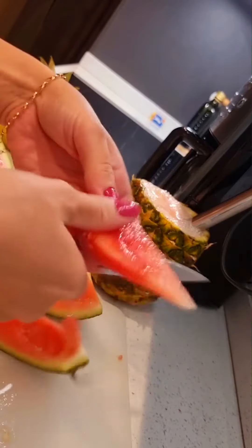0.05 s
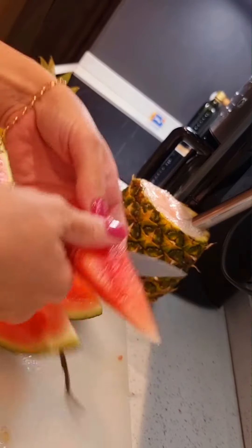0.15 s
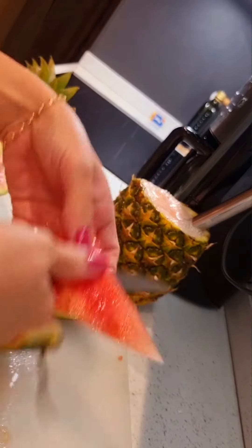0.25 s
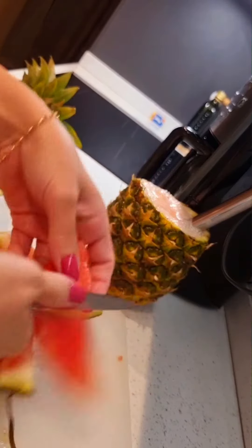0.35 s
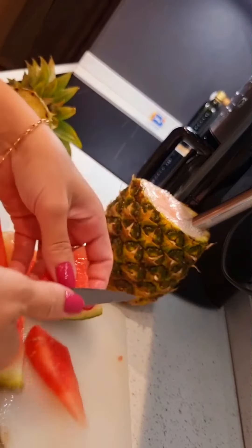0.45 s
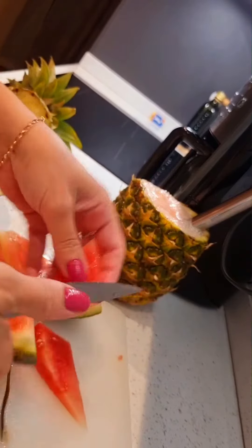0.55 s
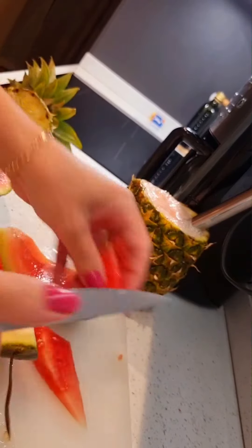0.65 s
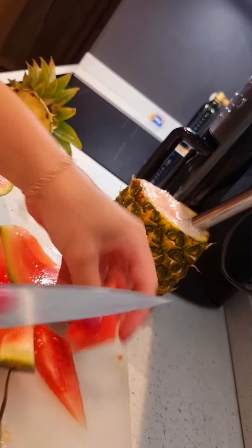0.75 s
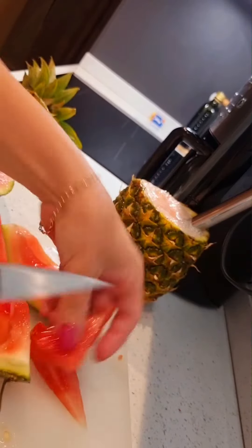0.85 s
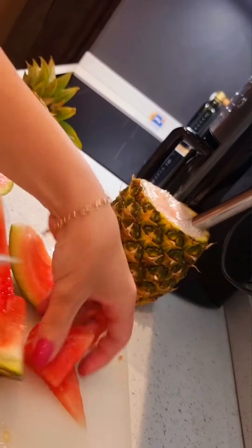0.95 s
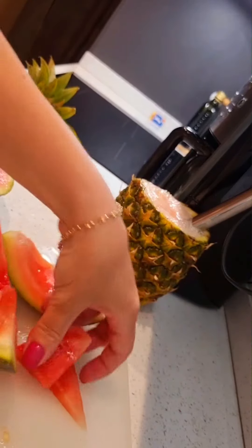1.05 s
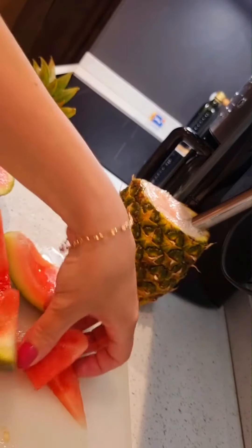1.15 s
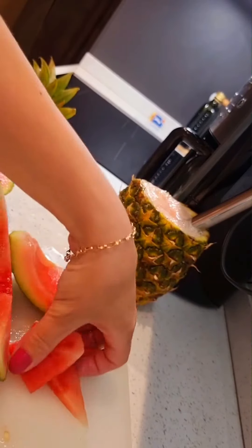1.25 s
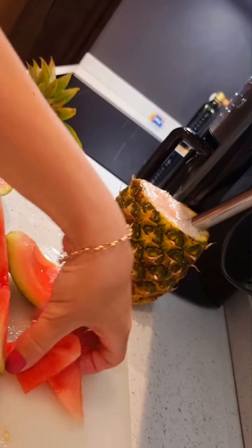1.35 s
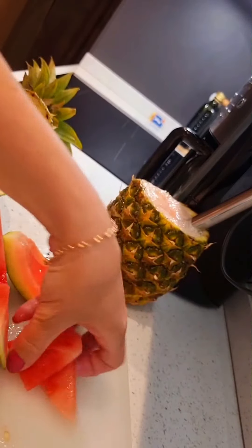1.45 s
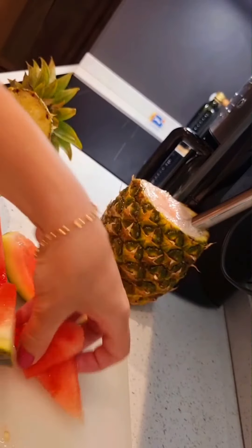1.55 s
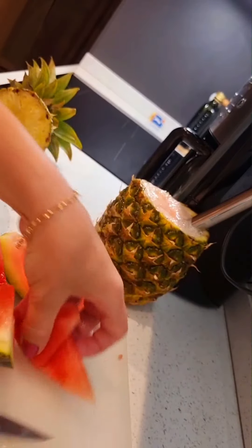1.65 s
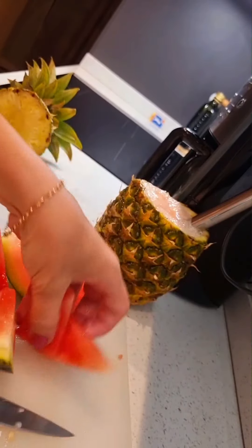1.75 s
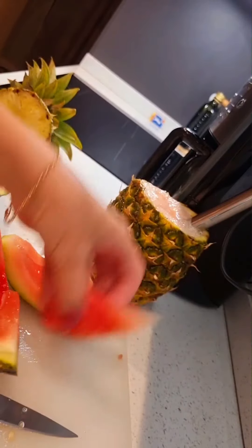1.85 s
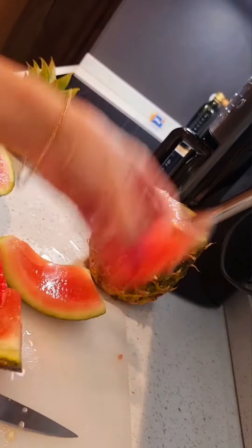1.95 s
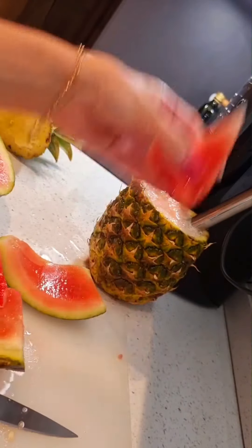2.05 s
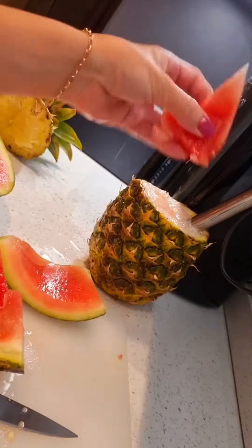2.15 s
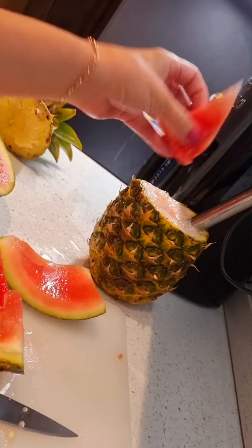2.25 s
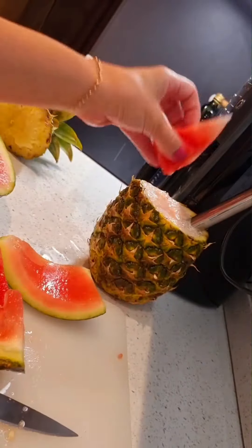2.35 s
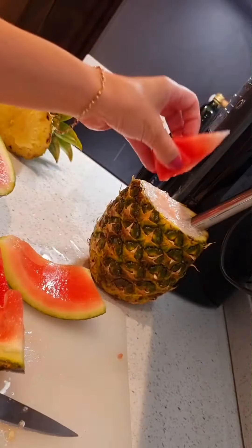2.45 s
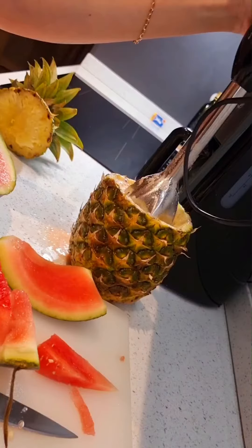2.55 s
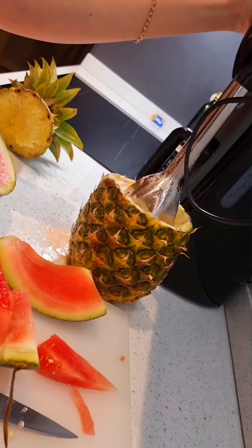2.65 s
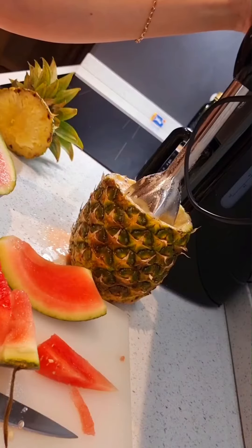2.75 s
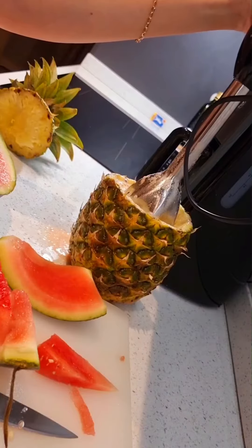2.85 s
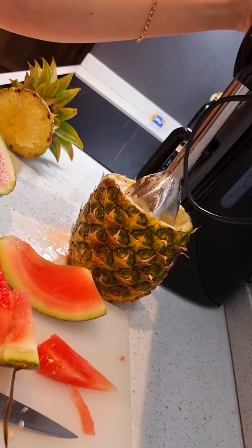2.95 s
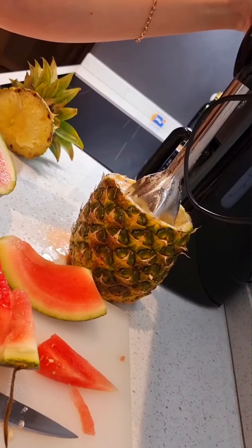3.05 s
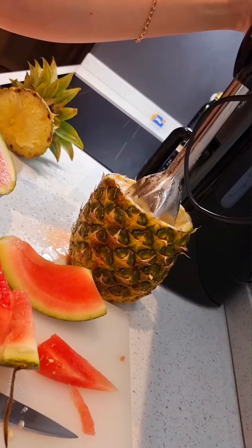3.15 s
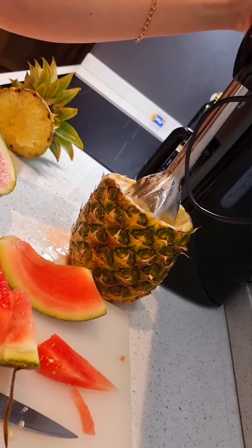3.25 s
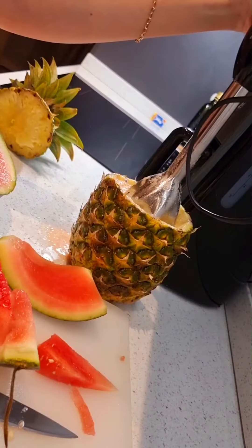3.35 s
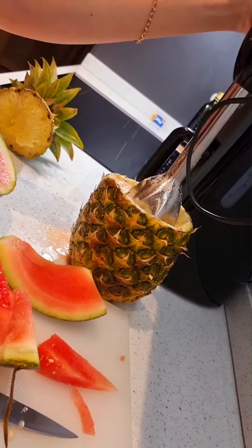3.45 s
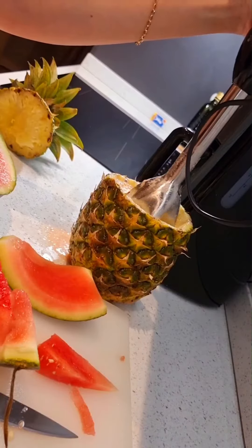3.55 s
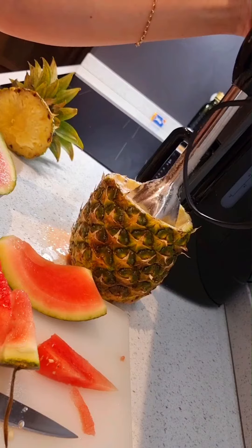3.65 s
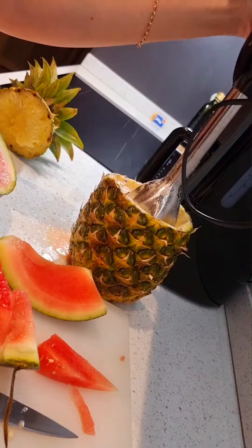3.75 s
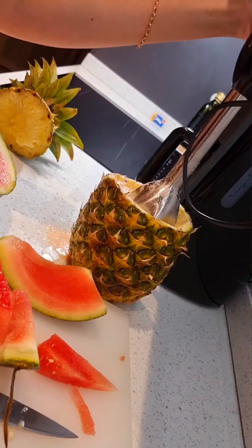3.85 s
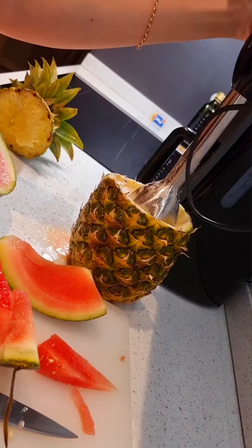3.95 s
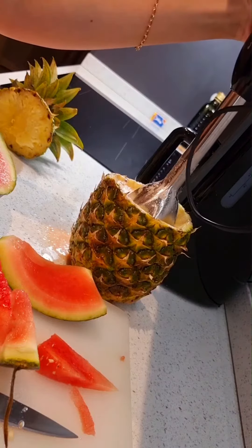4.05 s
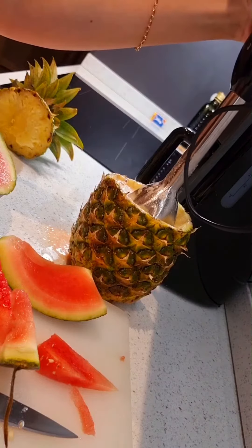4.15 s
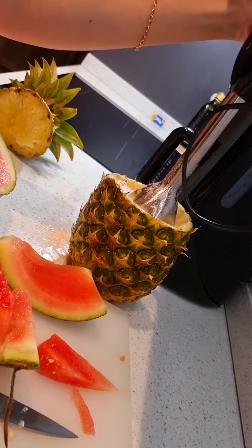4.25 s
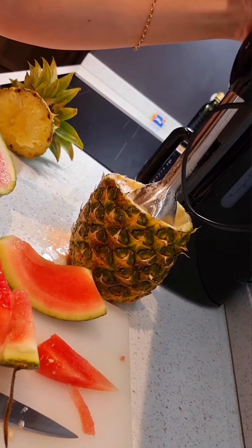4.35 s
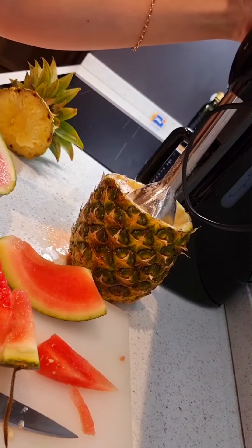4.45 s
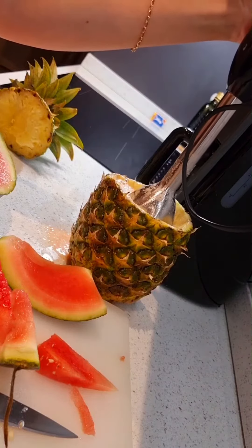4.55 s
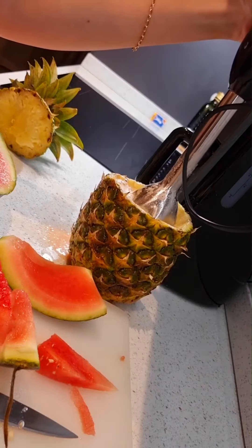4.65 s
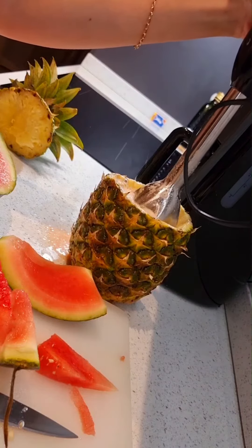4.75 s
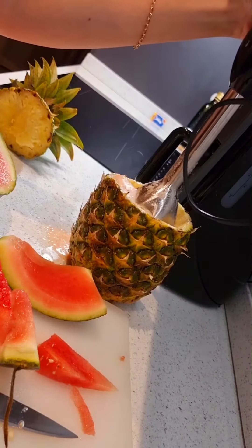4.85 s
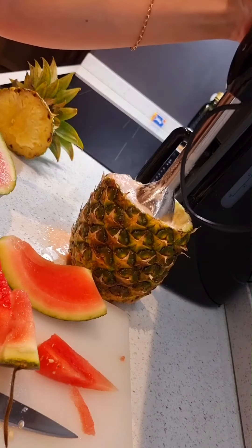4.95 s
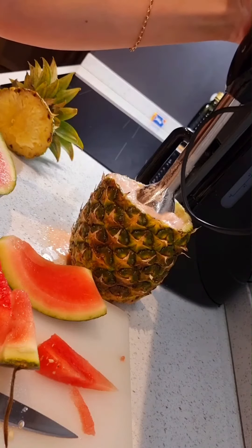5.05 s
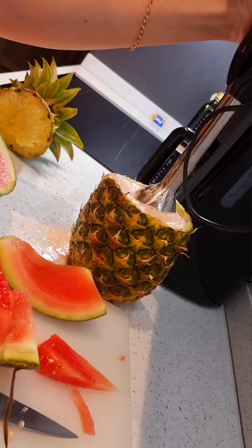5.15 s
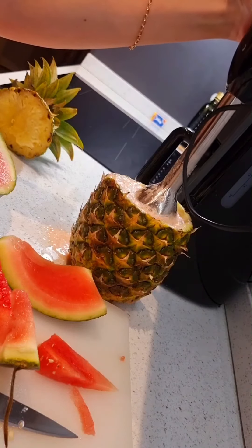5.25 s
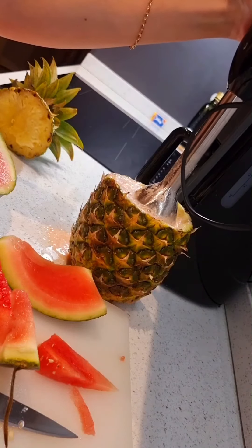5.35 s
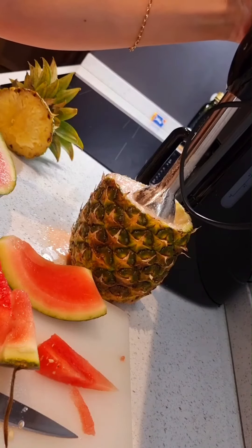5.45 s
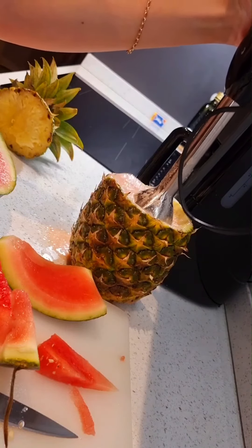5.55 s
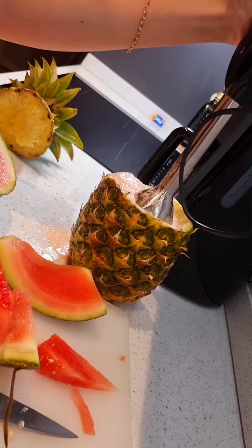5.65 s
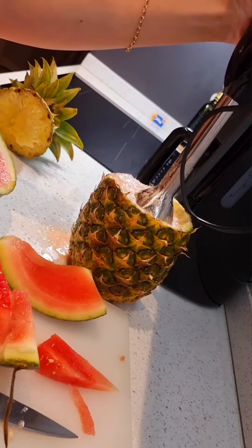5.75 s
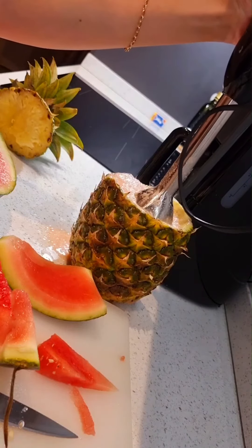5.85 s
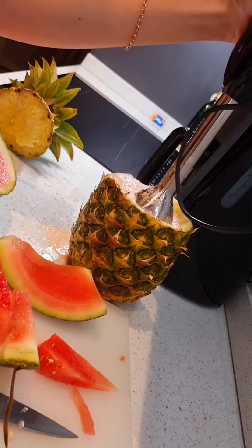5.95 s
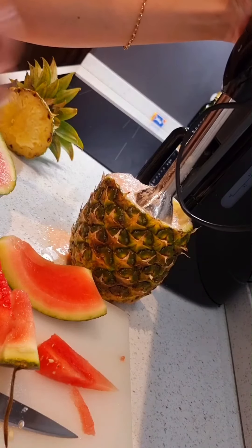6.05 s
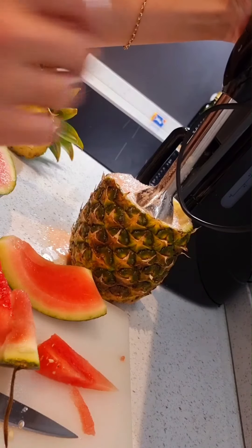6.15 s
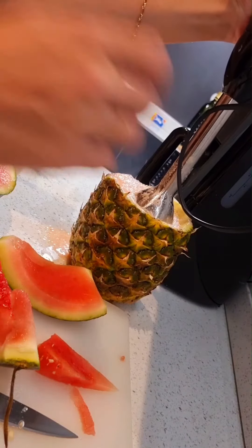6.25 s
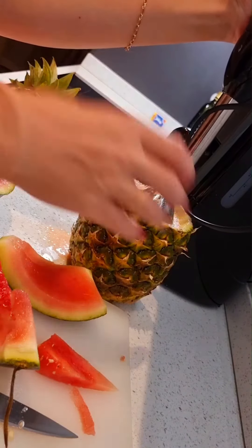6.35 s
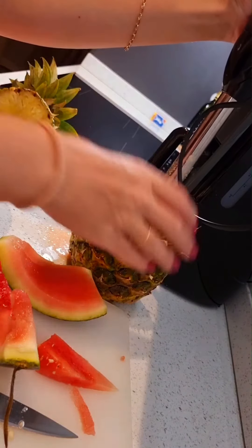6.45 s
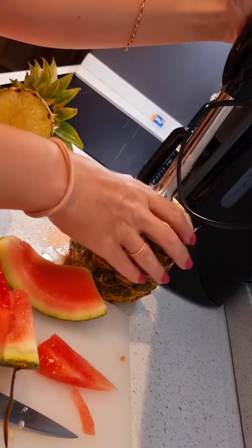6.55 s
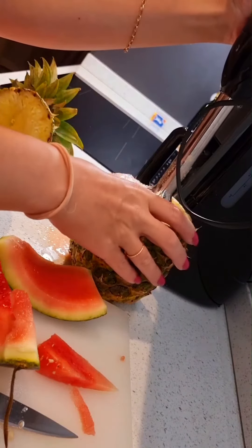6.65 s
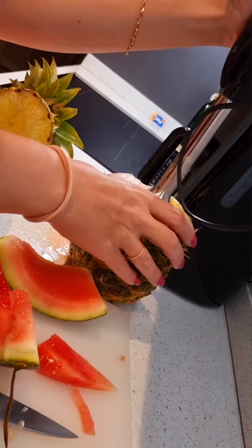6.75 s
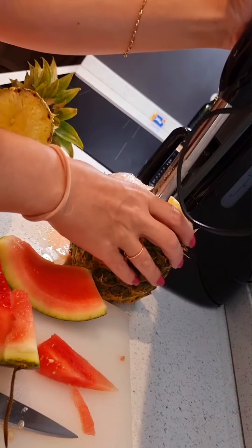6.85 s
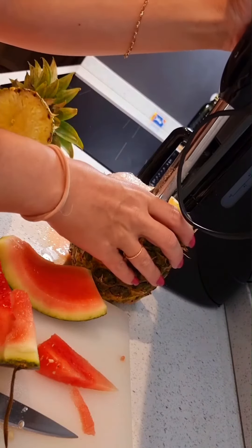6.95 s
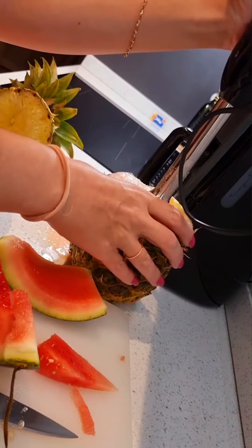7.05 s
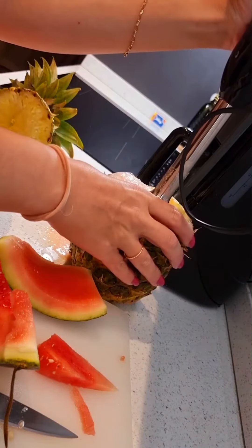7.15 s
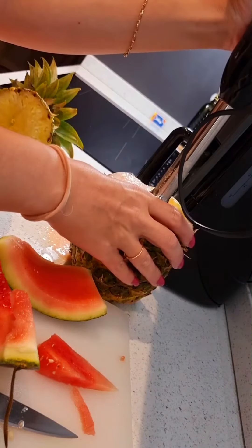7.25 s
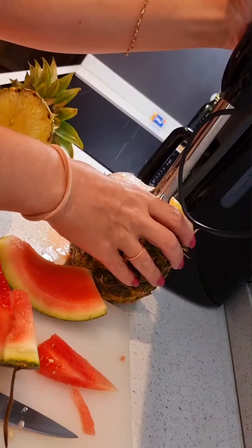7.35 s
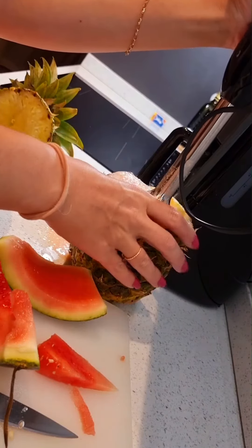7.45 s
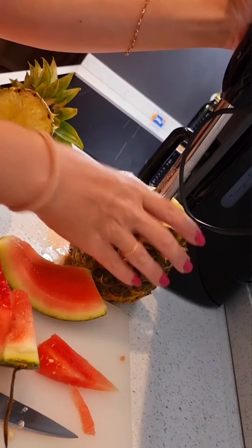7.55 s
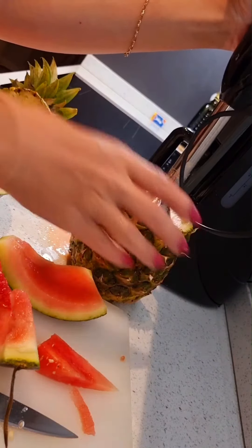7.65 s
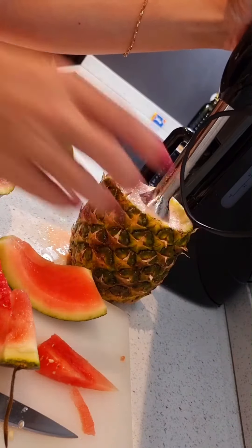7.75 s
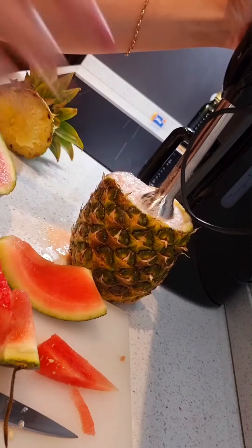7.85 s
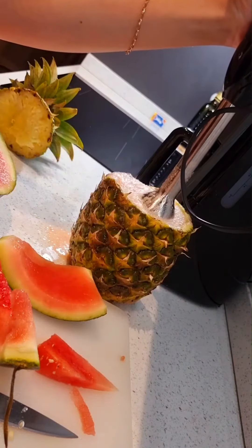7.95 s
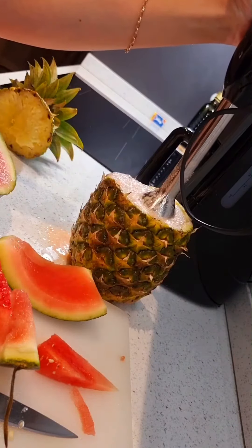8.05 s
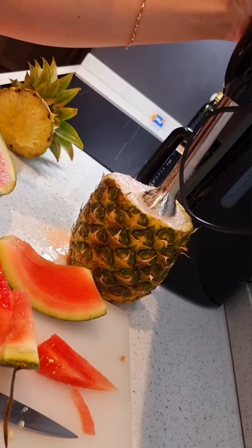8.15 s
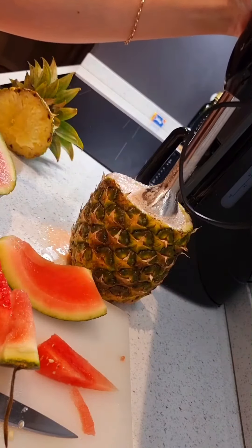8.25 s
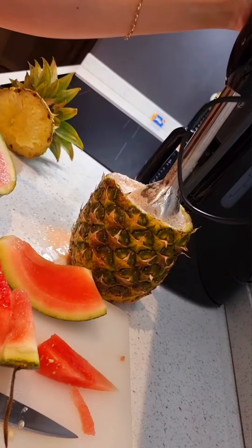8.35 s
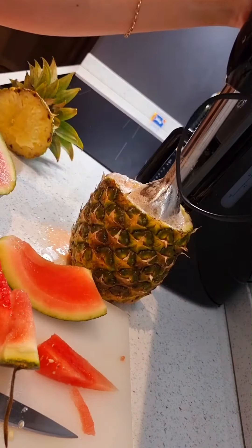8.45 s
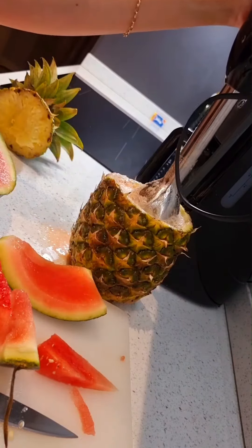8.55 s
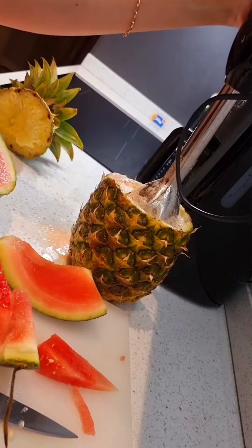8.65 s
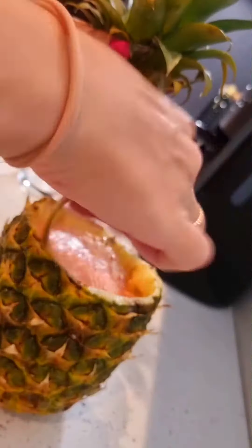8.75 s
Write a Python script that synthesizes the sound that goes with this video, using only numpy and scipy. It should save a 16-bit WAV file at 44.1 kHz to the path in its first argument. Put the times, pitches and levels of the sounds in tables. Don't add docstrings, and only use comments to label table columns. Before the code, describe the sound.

Soft fruit handling and a sharp knife clatter give way to a hand blender's whining motor, churning pulp in a hollow fruit in four presses.

```python
import sys
import numpy as np
from scipy import signal
from scipy.fft import rfft, irfft, next_fast_len
from scipy.io import wavfile
from scipy.ndimage import uniform_filter1d

SR = 44100
rng = np.random.default_rng(int(sys.argv[2]) if len(sys.argv) > 2 else 0)


def master_out(mix):
    frames = np.transpose(np.atleast_2d(mix))
    ceiling = np.clip(frames, -1, 1)
    pcm = np.round(ceiling * 32767).astype(np.int16)
    wavfile.write(sys.argv[1], SR, pcm)


def voltage_ratio(level):
    return 10 ** (np.asarray(level, float) / 20)


N = 388080

# on_s, off_s, drag of the pulp [1/turn], spin_up_s
PRESSES = [
    (3.68, 5.08, .0064, .05),
    (6.892, 7.135, .0096, .044),
    (7.362, 7.69, .012, .04),
    (7.815, 7.945, .0112, .045),
]


def in_time(rows, outside=None):
    s, *columns = np.transpose(rows)
    return np.array([np.interp(np.arange(N) / SR, s, c, outside, outside) for c in columns])


def bursts(tables):
    return np.max([in_time(rows, outside=-200) for rows in tables], axis=0)


def holds(rows, rise_s, fall_s):
    step = 8
    t = np.arange(0, N, step) / SR
    start, length = np.array(rows)[:, :1], np.array(rows)[:, 1:2]
    rise = 1 + (t - start) / rise_s
    fall = 1 - (t - start - length) / fall_s
    shapes = np.clip(np.minimum(rise, fall), 0, 1)
    return np.repeat(shapes, step, axis=1)[:, :N]


def at_hz(points, hz):
    points = np.array(points)
    return np.interp(np.log(np.maximum(hz, 1)), np.log(points[:, 0] + 1e-9), points[:, 1])


def rms_one(x):
    return x / np.sqrt(np.mean(x ** 2) + 1e-20)


def colour(x, points):
    size = next_fast_len(N)
    gain = voltage_ratio(at_hz(points, np.fft.rfftfreq(size, 1 / SR)))
    return rms_one(irfft(rfft(x, size) * gain, size)[..., :N])


def drift(rate):
    r = np.exp(-80 * np.pi * rate / SR)
    slow = signal.lfilter([1], [1, -2 * r, r * r], rng.standard_normal(N // 40 + 2002))[2000:]
    return np.interp(np.arange(N) / 40, np.arange(len(slow)), rms_one(slow))


def resonate(x, hz, width_hz):
    r = np.exp(-np.pi * width_hz / SR)
    poles = [1, -2 * r * np.cos(2 * np.pi * hz / SR), r * r]
    return signal.lfilter([(1 - r * r) / 2, 0, (r * r - 1) / 2], poles, x)


def body(x, peaks, patchy_db):
    total = 0
    for k, (hz, width_hz, level_db) in enumerate(peaks):
        flicker = voltage_ratio(level_db + patchy_db * drift(18.0))
        total = total + (-1) ** k * flicker * rms_one(resonate(x, hz, width_hz))
    return rms_one(total)


def ports(x, lead):
    # hz, left minus right db
    port_tilt = [(60, -5.5), (110, -3.0), (200, -1), (380, -0.5), (700, -11), (1290, -8.5), (2380, -2),
                 (4400, -5.5), (8120, -3), (15000, -2)]
    size = next_fast_len(N + 64)
    hz = np.fft.rfftfreq(size, 1 / SR)
    tilt = voltage_ratio(at_hz(port_tilt, hz) / 2)
    late = np.exp(-2j * np.pi * hz * lead / SR)
    return irfft(rfft(x, size) * [tilt, late / tilt], size)[:, :N]


def kitchen(x):
    # hz, time to fall 60 dB [s]
    room_t60 = [(100, 0.33), (1000, 0.42), (4000, .4), (15000, 0.25)]
    t, white = np.arange(SR // 2) / SR, rng.standard_normal((2, SR // 2))
    tail = 0
    for hz in 100 * 2. ** np.arange(8):
        octave = signal.butter(2, [hz / 1.414, hz * 1.414], "band", fs=SR, output="sos")
        tail = tail + signal.sosfilt(octave, white) * voltage_ratio(-60 * t / at_hz(room_t60, hz))
    tail = tail * np.clip(t / 0.0024, 0, 1) * voltage_ratio([[-2.5], [2.5]])
    return signal.fftconvolve(x[None], tail / np.sqrt(np.sum(tail ** 2) / 2), axes=1)[:, :N]


def background():
    # start_s, length_s, rustle_db, stirred_air_db
    moves = [(0, 0.29, -72, -63), (0.313, 0.13, -60, -61.5), (0.55, 0.089, -76, -57),
             (0.703, 0.34, -80, -65), (1.153, 0.46, -68.5, -59), (1.668, 0.036, -73, -50),
             (1.791, 0.02, -73, -44.5), (1.896, .2, -71.5, -56), (2.147, 0.25, -71.5, -61),
             (2.422, 0.21, -92.5, -69), (3.043, 0.17, -73, -72.5), (3.421, 0.19, -92, -86),
             (5.895, .06, -78.5, -86.5), (6.325, 0.49, -73, -63.5), (8.559, 0.214, -69, -64.5)]
    # start_s, rustle_db
    brushes = [
        (.33, -61),
        (.42, -63),
        (.478, -51.5),
        (.59, -53),
        (.645, -65),
        (1.254, -77),
        (2.3, -70),
        (6.057, -66.5),
        (8.655, -60),
    ]
    # start_s, length_s, extra_rumble_db
    thuds = [
        (0.602, 0.079, 5),
        (1.693, 0.03, 3.5),
        (1.849, 0.076, 4),
        (3.089, 0.065, 3),
        (4.854, 0.17, 15.5),
        (7.5, 0.36, 2.5),
        (8.67, .1, 1.5),
    ]
    # hz, level_db (per Hz)
    rumble_colour, air_colour = [(15, -57.5), (25, -40), (38, -5), (65, -3.5), (87, -0.5), (145, -6.5),
                                 (178, -5), (210, -25), (257, -16), (296, -32), (330, -38.5), (430, -59.5),
                                 (730, -120)], [(160, -41), (280, -12), (315, -11), (433, -7.5),
                                                        (521, -18.5), (659, -12), (938, -12.5), (2250, -20),
                                                        (15500, -50)]
    rustle_colour = [(880, -41), (1500, -11), (2800, 0), (3340, -6), (3650, -1), (4310, -7), (7520, -7),
                     (15500, -21)]
    still_air_db, still_rustle_db = -66, -90
    rustling, stirring = voltage_ratio(np.transpose(moves)[2:]) @ holds(moves, .035, .045)
    rustling = rustling + voltage_ratio(np.array(brushes)[:, 1]) @ holds([(s, 0) for s, _ in brushes], .015, .02)
    rumble_db = -44.5 + np.array(thuds)[:, 2] @ holds(thuds, .05, .12)
    white = rng.standard_normal((5, N))
    rumble = colour(ports(white[0], lead=6) + 0.1 * white[1:3], rumble_colour)
    air = colour(ports(white[3], lead=9) + .5 * white[1:3], air_colour)
    grains = voltage_ratio(2.8 * drift(40.0))
    rustle = colour((ports(white[4], lead=8.0) + 3.7 * white[2:0:-1]) * grains, rustle_colour)
    hiss = resonate(white[1:3], 13000, 5000)
    moving = np.hypot(voltage_ratio(still_air_db), stirring) * air + (voltage_ratio(still_rustle_db) + rustling) * rustle
    return voltage_ratio(rumble_db) * rumble + moving + voltage_ratio(-86) * hiss


def nudges():
    # start_s, peak_db, pitch_hz, time to fall 60 dB [s]
    pushes = [
        (3.084, -28.5, 110, 0.087),
        (3.149, -36, 70, 0.5),
        (3.233, -44, 64.7, 0.36),
        (8.644, -20.5, 91, 0.049),
        (8.722, -24.5, 90.7, 0.1),
    ]
    out, t = np.zeros(N + SR), np.arange(SR // 4) / SR
    for s, peak_db, hz, t60 in pushes:
        swing = voltage_ratio(peak_db - 60 * t / t60) * np.minimum(t * hz * 1.05, 1) * np.sin(2 * np.pi * hz * t)
        out[round(s * SR):][:len(t)] -= swing
    return np.array([voltage_ratio(-4) * np.roll(out[:N], 40), voltage_ratio(9.0) * out[:N]])


def rings():
    # pitch_hz, level_db, time to fall 60 dB [s]
    strikes = [
        ((0.9718, -47), [(2455, -6, 0.2), (3040, -5, .25), (3605, 10, 0.04), (3870, -3, 0.12), (4040, -8, .2)]),
        ((3.584, -44), [(2380, 5, 0.07), (2275, 1, .04), (1297, -1, 0.053), (3920, -12, 0.022)]),
        ((1.249, -50), [(1010, 1.5, 0.093), (4650, -6, .05)]),
    ]
    out, t = np.zeros(N + SR), np.arange(SR // 2) / SR
    for (s, level_db), modes in strikes:
        for hz, mode_db, t60 in modes:
            fade = voltage_ratio(level_db + mode_db - 60 * t / t60) * np.minimum(t / 0.0032, 1)
            out[round(s * SR):][:len(t)] += fade * np.sin(2 * np.pi * hz * t)
    return out[:N]


def knocks():
    # start_s, peak_db, pitch_hz, time to fall 60 dB [s], hardness_db
    contacts = [(0.585, -37, 714, 0.046, -12), (0.646, -46.5, 910, 0.1, -6), (1.251, -43, 1700, 0.06, 1),
                (1.592, -43, 2240, 0.06, 6), (1.6727, -19, 1850, 0.046, -2.5),
                (1.6726, -18, 920, 0.089, -4.5), (1.789, -19, 930, 0.062, 4.5),
                (1.937, -19.5, 1732, 0.061, 8.5), (3.081, -48.5, 903, 0.048, -12.5),
                (3.115, -55, 720, 0.034, -17), (3.071, -49.5, 1510, 0.19, -3), (3.1, -60, 3010, .15, -2.5),
                (3.584, -52, 4300, 0.029, -16), (3.585, -42, 895, 0.14, 2.5), (3.582, -43, 6600, 0.038, 18),
                (3.699, -33, 2300, 0.046, 2), (3.694, -35, 730, 0.19, 7), (6.901, -44.5, 760, .2, -8),
                (5.908, -68, 872, 0.051, -7), (6.058, -62, 1173, 0.028, -14.5),
                (6.769, -55.5, 1272, 0.042, -6), (6.904, -46, 2600, 0.055, 9),
                (8.646, -46, 1434, 0.048, -17), (8.653, -42.5, 3170, 0.21, 2),
                (0.973, -49, 11000, 0.057, -7.5), (0.973, -48, 6600, 0.054, -3)]
    clinks = [
        (0.9727, -22.5, 3520, 0.35, -10),
    ]
    soft_below_db, hard_rise_s, soft_rise_s = -38, .0012, .006
    out, t = np.zeros(N + SR), np.arange(SR // 4) / SR
    for parts_db, (s, peak_db, hz, t60, hard_db) in [(-8, k) for k in contacts] + [(-37, k) for k in clinks]:
        rise = np.minimum(t / (soft_rise_s if peak_db < soft_below_db else hard_rise_s), 1)
        fade = (1 + 0.93 * voltage_ratio(-60 * t / 0.025)) * voltage_ratio(-60 * t / np.clip(t60, .005, .4))
        burst = rng.standard_normal((3, len(t))) * rise * fade
        levels = voltage_ratio(peak_db - 4.0 + np.array([0, parts_db + hard_db, parts_db - hard_db]))
        bands = [(hz * .7, hz * 1.25), (1300, 4500), (90, 450)]
        for level, band, noise in zip(levels, bands, burst):
            part = signal.sosfilt(signal.butter(3, band, "band", fs=SR, output="sos"), noise)
            out[round(s * SR):][:len(t)] += level * part / np.abs(part).max()
    return out[:N]


def knife():
    # time after landing [s], level_db
    bounces = [
        (0, -1.5),
        (.0045, -8),
        (.007, -9.5),
    ]
    # pitch_hz, width_hz, level_db
    board = [(238, 60, -28), (890, 470, -6.5), (1390, 390, -1), (2080, 740, 1), (2600, 260, -2.5),
             (4700, 1100, -3.5), (8750, 1600, -24.5)]
    landing_s, skid_s = 1.824, .0095
    t = np.arange(SR // 4) / SR - skid_s
    after = np.maximum(t, 0)
    rattling = .045 * voltage_ratio(-60 * after / .04) + .013 * voltage_ratio(-60 * after / .3)
    chatter = rng.standard_normal(len(t)) * np.where(t < 0, .017, rattling)
    for s, level_db in bounces:
        chatter[np.argmax(t >= s)] = voltage_ratio(level_db)
    crash = 0
    for k, (hz, width_hz, level_db) in enumerate(board):
        crash = crash + (-1) ** k * voltage_ratio(level_db) * resonate(chatter, hz, width_hz) * 1000 / width_hz
    crash = signal.sosfilt(signal.butter(2, 9500, fs=SR, output="sos"), crash)
    out = np.zeros(N)
    out[round((landing_s + t[0]) * SR):][:len(t)] = -voltage_ratio(3) * crash / crash[np.abs(crash).argmax()]
    return out


def switch():
    return holds([(on + .012, off - on - .012) for on, off, *_ in PRESSES], .012, .02)


def latest_press():
    return np.maximum(np.searchsorted(np.array(PRESSES)[:, 0], np.arange(N) / SR) - 1, 0)


def shaft():
    # time_s, speed [turns/s]
    loaded = [
        [(3.69, 230), (4.1, 233), (4.6, 226), (4.72, 216), (4.79, 203), (5.1, 204)],
        [(7.1, 223), (7.45, 205), (7.68, 208), (7.85, 205)],
    ]
    friction, drag = 120, 1.
    step = 32
    powered = switch().max(axis=0)[::step] > .3
    goals = in_time(np.vstack(loaded))[0, ::step]
    feel = np.array(PRESSES)[latest_press()[::step], 2:]
    speed, now = [], 0.
    for on, goal, (thick, spin_up_s) in zip(powered, goals, feel):
        gain = (goal - now) / spin_up_s if on else -friction - drag * now - thick * now ** 2
        now = max(now + step / SR * gain, 1.)
        speed.append(now)
    return np.interp(np.arange(N) / step, np.arange(len(speed)), speed)


def efforts(speed):
    # start_s, length_s, extra_hiss_db, extra_hum_db, extra_rattle_db
    leans = [
        (3.95, 0.078, 6.5, 2.5, -3),
        (4.314, 0.96, 2.5, 1.5, 4.5),
        (4.698, 0.022, 7.5, -2, 12.5),
        (4.783, 0.11, 18, 27, 13.5),
        (4.921, 0.13, 16.5, 8, 11),
        (7.068, 0.24, 0, -3, 6.5),
        (7.422, 1, 2.5, 2.5, -2),
        (7.88, 0.13, 3.5, 16.5, 1.5),
    ]
    # time_s, level_db
    depth = [
        [(4.55, -44), (4.68, -31.5), (4.76, -16.5), (4.9, -17.5), (5.03, -25), (5.16, -27), (5.5, -42),
         (5.6, -59)],
        [(6.9, -50.5), (7.18, -32), (7.32, -25.5), (7.37, -29), (7.42, -19.5), (7.75, -21), (7.9, -20),
         (8.1, -24), (8.45, -40)],
    ]
    # time_s, extra_db
    lumps = [
        (4.919, 3.5),
        (7.488, -1.5),
        (7.956, 2.5),
    ]
    # once_a_turn_hum_db, overtones_db
    grips = [
        (-42.5, -40),
        (-38.5, -35.5),
        (-35, -32),
        (-39.5, -18.5),
    ]
    stall, rated = 5, 220
    hiss_power, rattle_power, once_power, overtone_power, churn_power = 0.96, 1.6, 4.6, 11, 1.31
    pace = np.maximum(speed - stall, .01) / (rated - stall)
    leaning = np.transpose(leans)[2:, :, None] * holds(leans, .071, .021)
    extra_hiss, extra_hum, extra_rattle = np.max(leaning, axis=1)
    lump_db = np.array(lumps)[:, 1] @ holds([(s, 0) for s, _ in lumps], .0098, .0098)
    pulp = voltage_ratio(bursts(depth)[0] + lump_db) * pace ** churn_power
    once_db, over_db = np.array(grips)[latest_press()].T
    sparks = voltage_ratio(-61) * switch().max(axis=0)
    hiss = voltage_ratio(extra_hiss) * (voltage_ratio(-42.5) * pace ** hiss_power + sparks)
    rattle = voltage_ratio(-34.5 + extra_rattle) * pace ** rattle_power + voltage_ratio(-3.5) * pulp
    once = voltage_ratio(once_db + extra_hum) * pace ** once_power
    over = voltage_ratio(over_db) * pace ** overtone_power / (1 + pulp / voltage_ratio(-33))
    wake_db = np.clip(4 * (extra_hiss - 3), 0, 22)
    twice = voltage_ratio(once_db - 10 + wake_db) * pace ** once_power
    return 20 * np.log10(np.array([hiss, rattle, once, over, twice, pulp]) + 1e-12)


def gulps():
    # start_s, peak_db, pitch_hz, time to fall 60 dB [s]
    throws = [(4.7, -24.5, 1282, .12), (4.754, -13, 396.4, .2), (4.794, -18.5, 1410, .2),
              (4.822, -10.5, 200, 0.28), (4.823, -16, 650, 0.034), (4.852, -9.5, 389.7, .15),
              (4.885, -19.5, 390, .1), (4.916, -9.5, 396.8, 0.17), (4.939, -14.5, 299, 0.22),
              (4.96, -13.5, 379, .1), (5.092, -18.5, 220, 0.118), (5.155, -28, 506, .2),
              (7.264, -17.5, 407, .1), (7.292, -20, 497.7, 0.33), (7.325, -20.5, 497, 0.22),
              (7.41, -17, 501, 0.25), (7.61, -24, 533, 0.13), (7.69, -18, 496, 0.19), (7.84, -25, 501, .15),
              (4.87, -19, 290, 0.21), (4.975, -15, 287.7, 0.16), (7.378, -16.5, 474.5, .2),
              (7.435, -23.5, 787, 0.27), (7.45, -17, 462, 0.16), (7.478, -11, 792, 0.11),
              (7.484, -11, 401, 0.29), (7.482, -11.5, 492, 0.13), (7.52, -26.5, 432, 0.106),
              (7.575, -20, 399.6, 0.25), (7.585, -13.5, 508, 0.14), (7.641, -12, 407, 0.13),
              (7.643, -15.5, 525, 0.16), (7.665, -19, 794, 0.087), (7.67, -11.5, 1200, 0.14),
              (7.72, -17, 750, 0.103), (7.722, -12, 376, 0.075), (7.81, -13, 497, .15),
              (7.867, -20.5, 556, 0.121), (7.89, -20, 760, 0.16), (7.912, -11.5, 404, 0.16),
              (7.955, -17, 760, .1), (7.964, -20.5, 404, 0.25)]
    # time_s, pitch_hz, level_db
    funnel_path = [
        (5.04, 1270, -50),
        (5.1, 1300, -35),
        (5.15, 1330, -34),
        (5.2, 1440, -40),
        (5.3, 1520, -44),
        (5.36, 1540, -65),
    ]
    out, t = np.zeros(N + SR), np.arange(SR // 4) / SR
    for (s, peak_db, hz, t60), turn in zip(throws, rng.random(len(throws))):
        fade = voltage_ratio(peak_db - 60 * t / t60) * np.minimum(t / .0041, 1)
        out[round(s * SR):][:len(t)] += fade * np.sin(2 * np.pi * (hz * t + turn))
    hz, level_db = in_time(funnel_path, outside=-200)
    phase = np.cumsum(hz) / SR + .08 * drift(30.0)
    funnel = voltage_ratio(level_db + 2.5 * drift(25.0)) * np.sin(2 * np.pi * phase)
    return out[:N] * voltage_ratio(drift(76.0)) + funnel


def churn(turns, pulp_db):
    # pitch_hz, width_hz, level_db
    cavity = [(285, 80, -5.5), (390, 60, -2), (495, 100, -1), (620, 120, -4), (790, 130, -5),
              (1000, 170, -8)]
    passes = np.diff(np.floor(2 * turns + .22 * drift(80.0)), prepend=0) > 0
    pattern = voltage_ratio(3.5 * np.cos(2 * np.pi * turns) + 4 * np.cos(np.pi * turns))
    slaps = passes * pattern * voltage_ratio(3.6 * rng.standard_normal(N))
    slosh = rng.standard_normal(N) * voltage_ratio(2.5 * drift(30))
    return voltage_ratio(pulp_db) * body(rms_one(slaps) + 1.89 * slosh, cavity, patchy_db=2.5)


def motor_hum(turns, once_db, over_db, twice_db):
    hum_orders = [(1, 5), (2, -8.5), (3, 11), (4, 8), (5, 8), (6, 2), (7, -4), (8, -1), (9, -8), (10, -10),
                  (11, -6), (12, -10), (13, -7), (14, -8), (15, -10)]
    wobble = turns + .005 * drift(40)
    flutter = voltage_ratio(1.3 * drift(8))
    lines = []
    for k, level_db in hum_orders:
        tone = np.sin(2 * np.pi * (k * wobble + rng.random()))
        lines.append(voltage_ratio(level_db) * np.roll(flutter, round(k * SR / 3)) * tone)
    low = voltage_ratio(once_db) * rms_one(lines[0]) + voltage_ratio(twice_db) * rms_one(lines[1])
    return low + voltage_ratio(over_db) * rms_one(sum(lines[2:]))


def motor_whine(slots, speed, hiss_db):
    slot_orders = [(6, 4, 7, 0), (12, -9, 13, 9), (18, -25, 0, 26), (20, -25, 0, 25), (24, 2, 1, 6),
                   (29, -25, 0, 22), (32, -25, 0, 32), (34, -25, 0, 30), (36, -2, 1, 10), (42, -25, 0, 25),
                   (48, 3, -6, -1), (49, -25, 0, 24), (72, -2, -10, 0), (96, -9, -10, 0),
                   (120, -12, -10, 0)]
    # hz, level_db
    casing = [(500, -30), (1000, -16), (1300, -2), (1550, -9), (2000, 0), (2300, 7), (2700, 11), (3100, 3),
              (3600, -4), (4300, -4), (4900, 1), (5700, -1), (6800, 4), (7600, -3), (8400, -2), (11000, -3),
              (15000, -16)]
    # speed [turns/s], level_db
    whine_level = [(11, -68), (30, -60), (60, -58), (110, -55), (170, -54), (205, -57), (233, -59)]
    bead_db, powered = 3.3 * drift(25), switch().max(axis=0)
    free = np.clip((speed - 216) / (228 - 216), 0, 1)
    surge = np.clip(uniform_filter1d(np.gradient(speed), 512) * SR / 600, 0, 1)
    whine = 0
    for k, level_db, lift_db, free_db in slot_orders:
        line_db = level_db + lift_db * surge + free_db * free + at_hz(casing, k * speed)
        level = voltage_ratio(line_db + np.roll(bead_db, k * 1000)) * (k * speed < SR / 3)
        whine = whine + level * np.sin(2 * np.pi * k * slots)
    whine = whine + 5 * resonate(rng.standard_normal(N), 2600, 200)
    running = np.clip((hiss_db + 98) / 15, 0, 1)
    return voltage_ratio(at_hz(whine_level, speed) + 3 * powered) * running * whine


def motor(turns, hiss_db, rattle_db, once_db, over_db, twice_db):
    # hz, level_db (per Hz)
    hiss_colour = [(250, -8), (500, -9), (1000, -6.5), (2700, 2), (3300, -10.5), (4300, -8), (6500, -12),
                   (8500, -19.5), (11000, -22), (13800, -19), (15500, -23)]
    # pitch_hz, width_hz, level_db
    shell = [(1200, 250, 4.5), (1346, 280, 7.5), (1614, 400, 1.5), (2398, 110, -7.5), (2700, 430, -24)]
    hum = motor_hum(turns, once_db, over_db, twice_db)
    slots = turns + .002 * drift(50)
    whine = motor_whine(slots, np.gradient(turns) * SR, hiss_db)
    beat = voltage_ratio(1.4 * np.cos(2 * np.pi * turns) + 0.52 * drift(27.0))
    scratch = rng.standard_normal(128)[(slots % 1 * 128).astype(int)]
    rubbing = rng.standard_normal((3, N)) * beat + .85 * scratch * [[1], [.8], [-.2]]
    hiss = colour(rubbing, hiss_colour) * voltage_ratio(hiss_db)
    rattle = body(rng.standard_normal(N) * beat, shell, patchy_db=2.5)
    return hum + voltage_ratio(rattle_db - 1.0) * rattle + hiss[0], whine, hiss[1:]


def scene():
    swing_db = [0, 1.5, 1.5, 2]
    speed = shaft()
    turns = np.cumsum(speed) / SR
    *motor_db, pulp_db = efforts(speed)
    housing, whine, scattered = motor(turns, *motor_db)
    blender = housing + churn(turns, pulp_db) + gulps()
    small, blow = knocks() + rings(), knife()
    wet = kitchen(voltage_ratio(-3.5) * blender + voltage_ratio(-14.5) * whine + voltage_ratio(-10.5) * small + voltage_ratio(-6.0) * blow)
    wet = signal.sosfilt(signal.butter(3, 330, "high", fs=SR, output="sos"), wet)
    scattered = scattered - resonate(scattered, 760, 2600)
    singing = ports(whine, lead=19) * [[1.], [2.1]]
    on_board = ports(small + blow, lead=4.5)
    held_db = uniform_filter1d(np.array(swing_db, float)[latest_press()], size=2048)
    swing = voltage_ratio(held_db * [[-.5], [.5]])
    direct = voltage_ratio(0.5) * ports(blender, lead=16.1) + singing + voltage_ratio([[7.5], [11.5]]) * scattered
    return swing * direct + on_board + wet + nudges() + background()


def top_cut(x):
    return signal.sosfilt(signal.butter(12, 15810, fs=SR, output="sos"), x)


def record(dry):
    dry = signal.sosfilt(signal.butter(3, 42, "high", fs=SR, output="sos"), dry)
    dry = signal.sosfilt(signal.cheby2(10, 60, 16500, fs=SR, output="sos"), dry)
    end_s = 8.763
    stop = np.clip((end_s - np.arange(N) / SR) / .001, 0, 1)
    return top_cut(np.tanh(dry / 1.891) * 1.204 * stop)


dry = scene()
out = record(dry)
master_out(out)
```